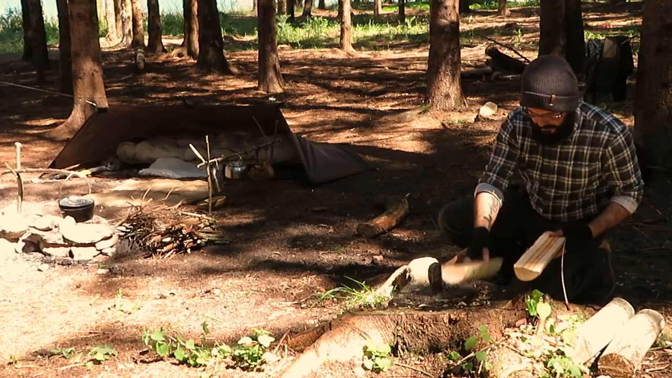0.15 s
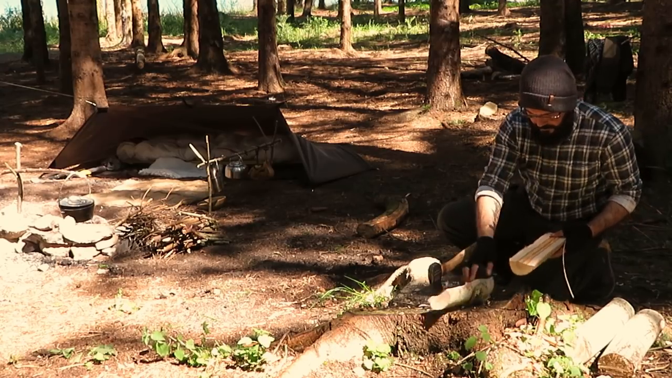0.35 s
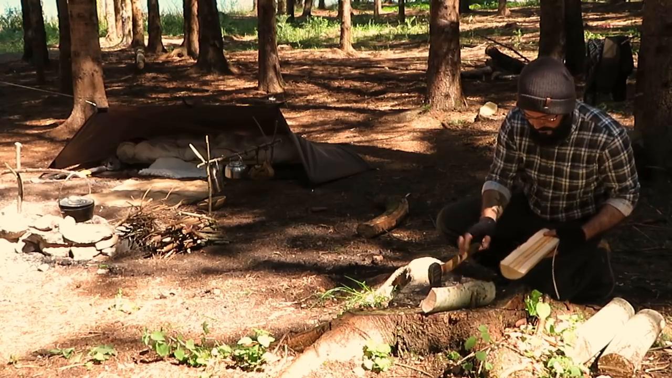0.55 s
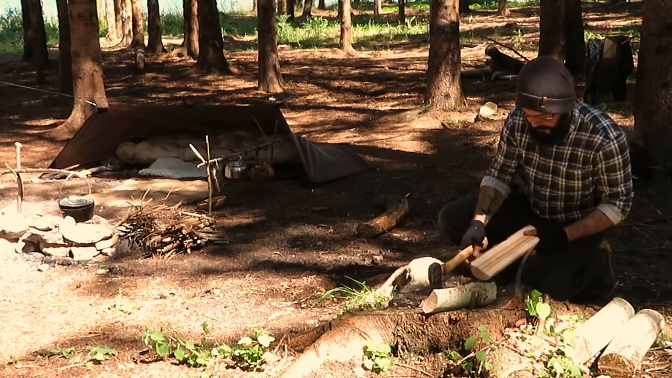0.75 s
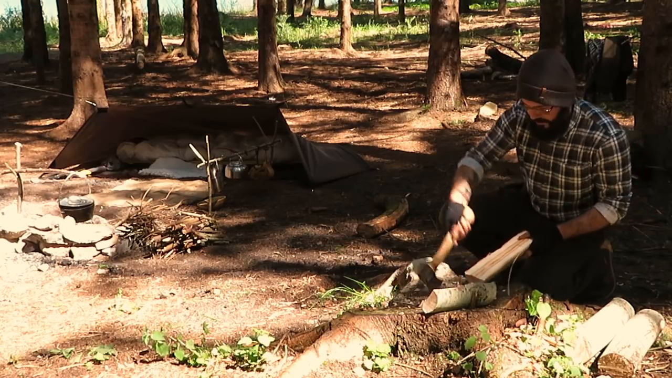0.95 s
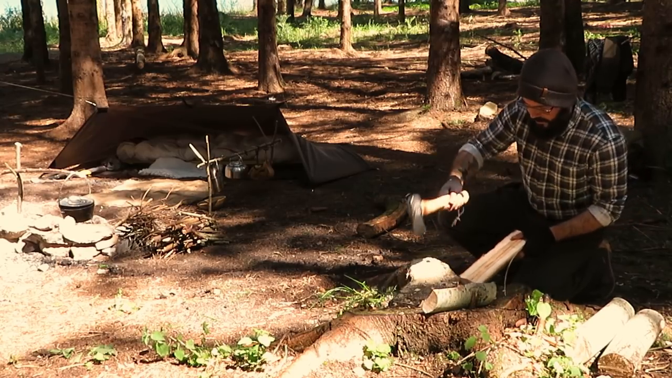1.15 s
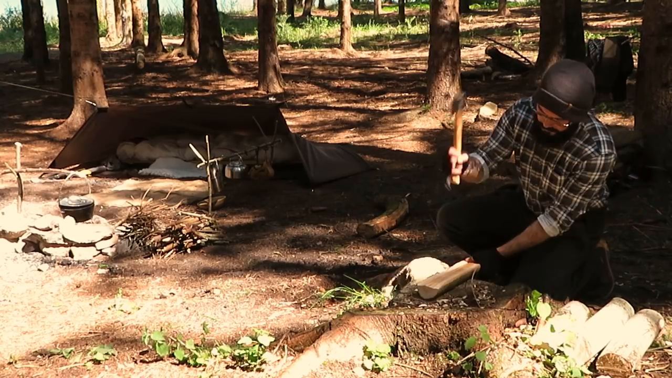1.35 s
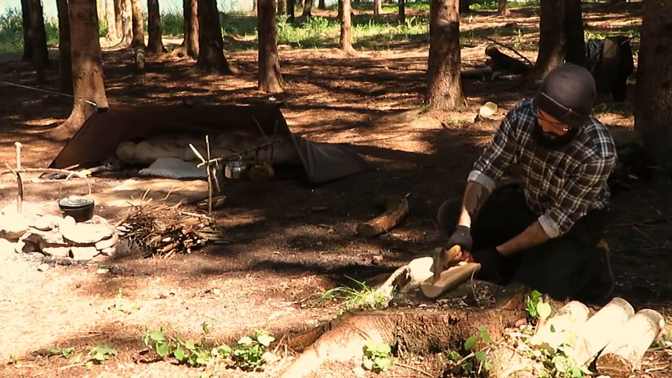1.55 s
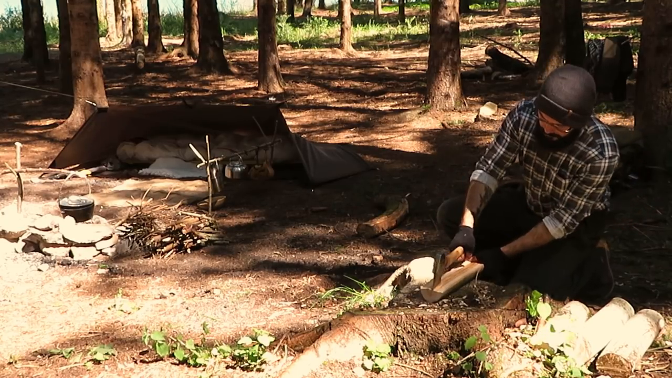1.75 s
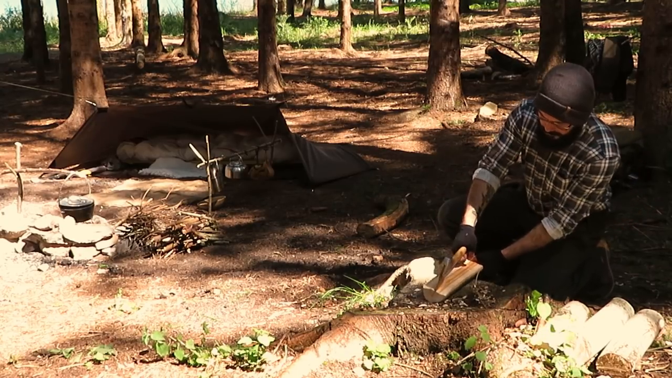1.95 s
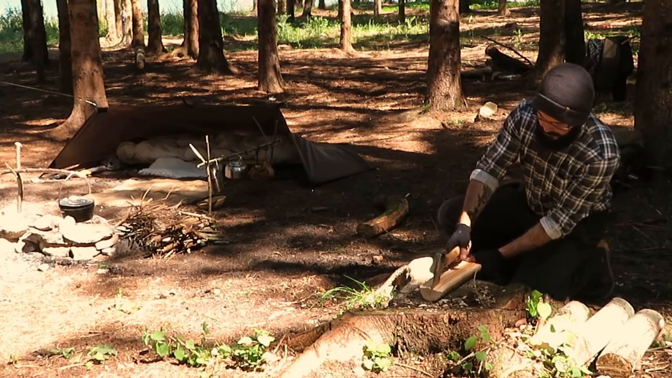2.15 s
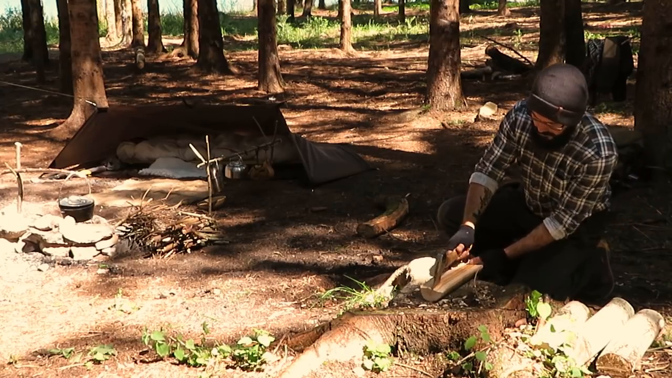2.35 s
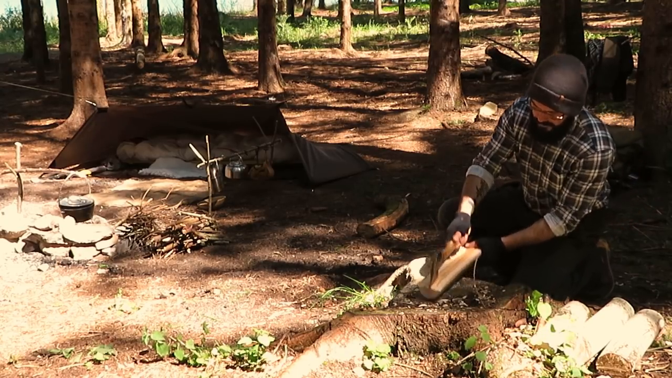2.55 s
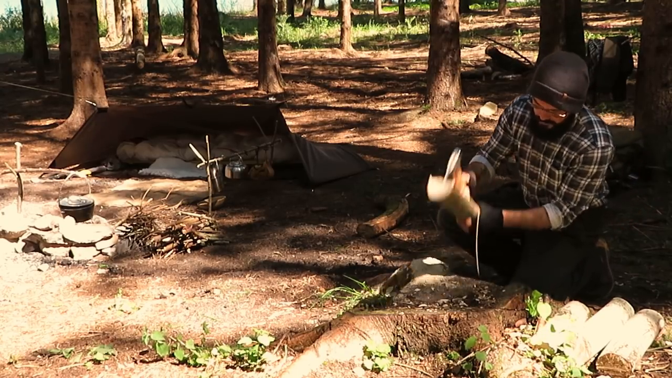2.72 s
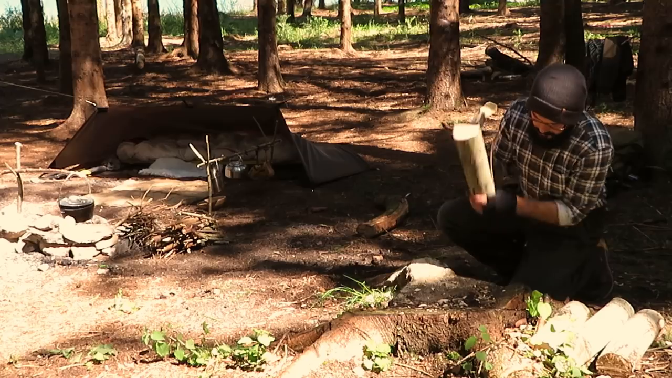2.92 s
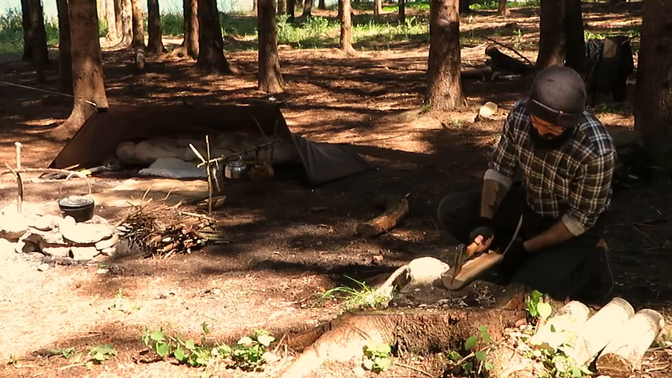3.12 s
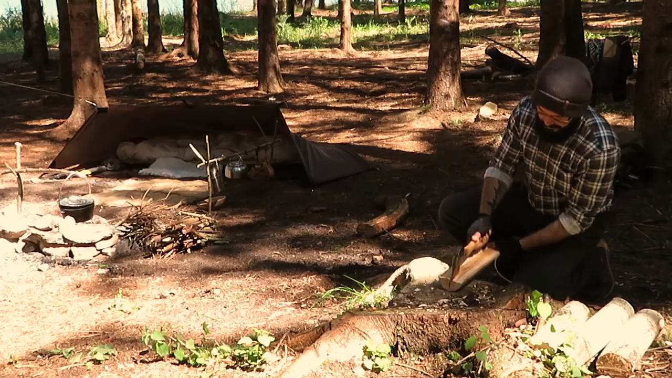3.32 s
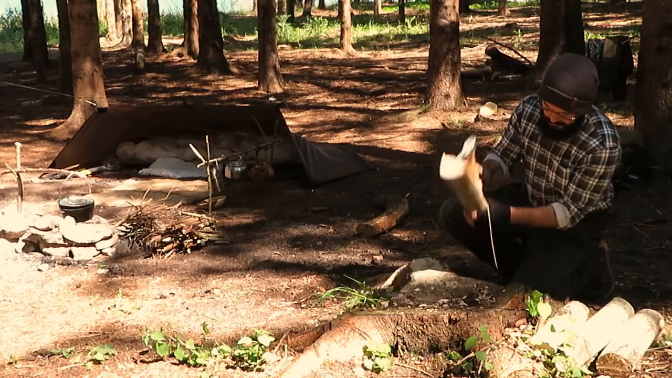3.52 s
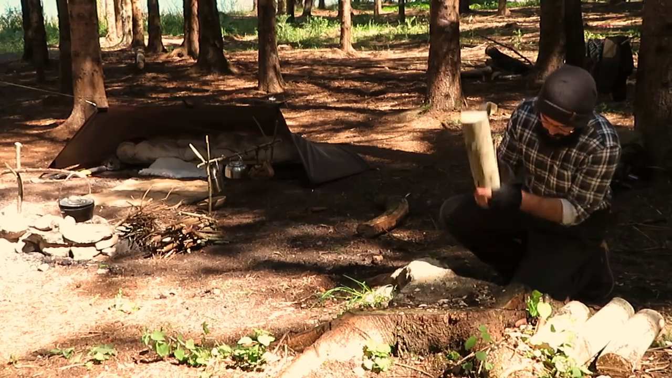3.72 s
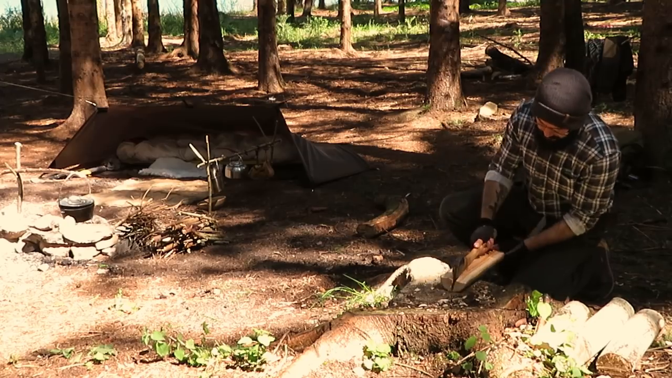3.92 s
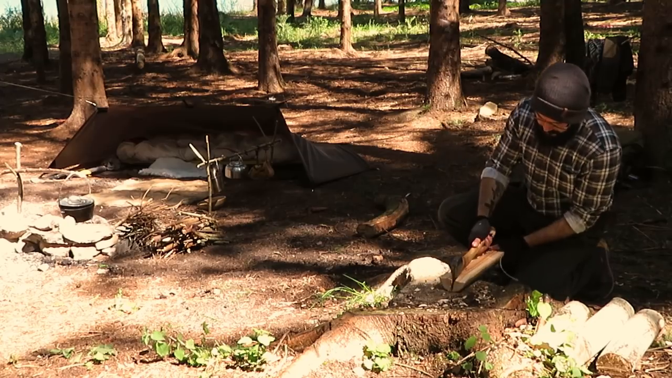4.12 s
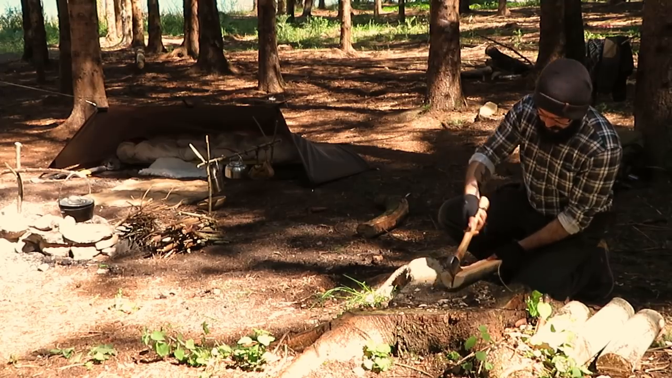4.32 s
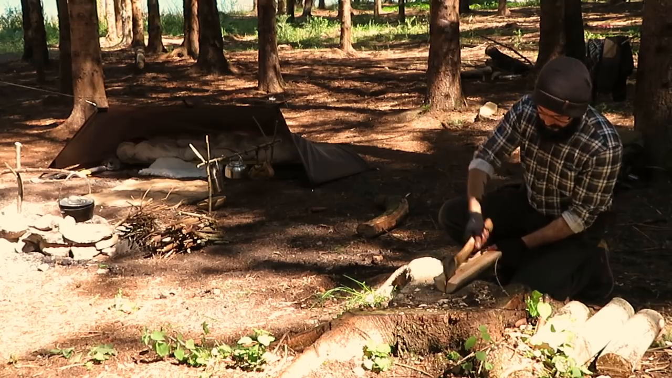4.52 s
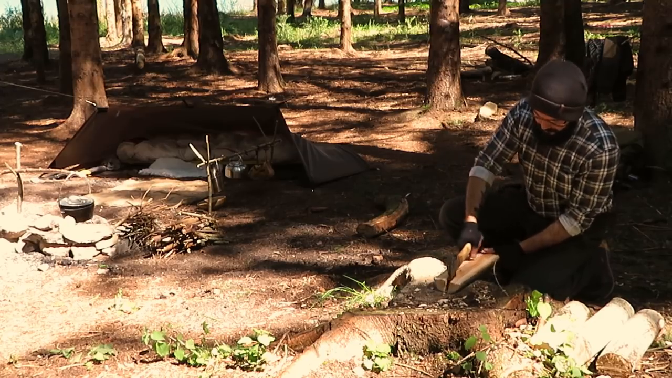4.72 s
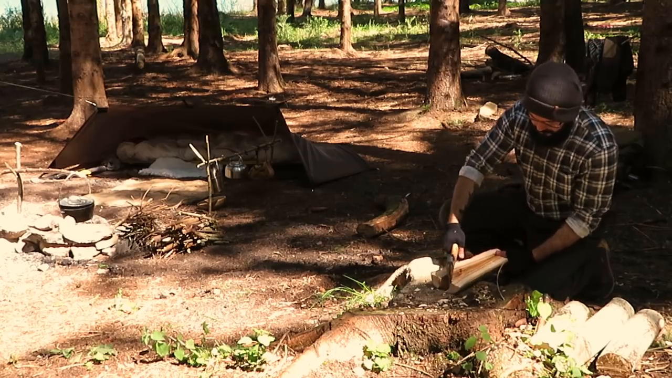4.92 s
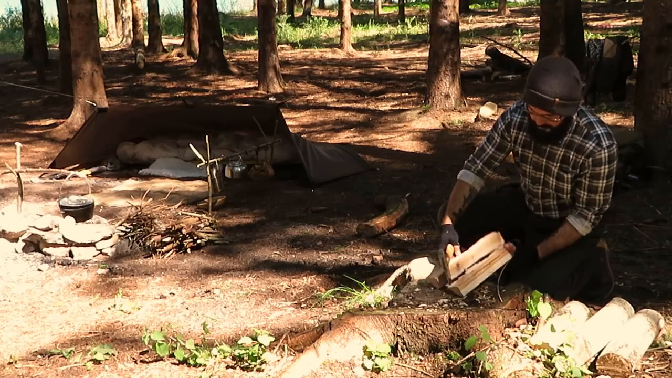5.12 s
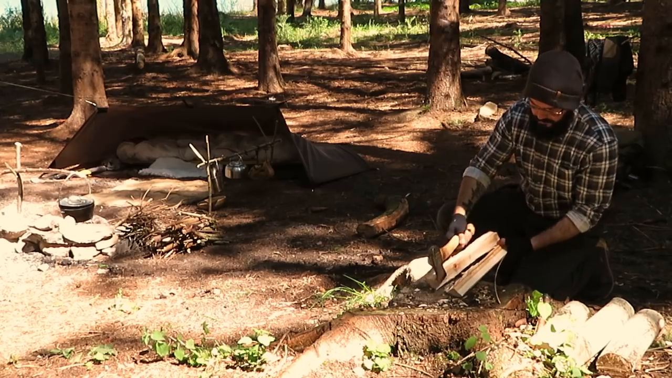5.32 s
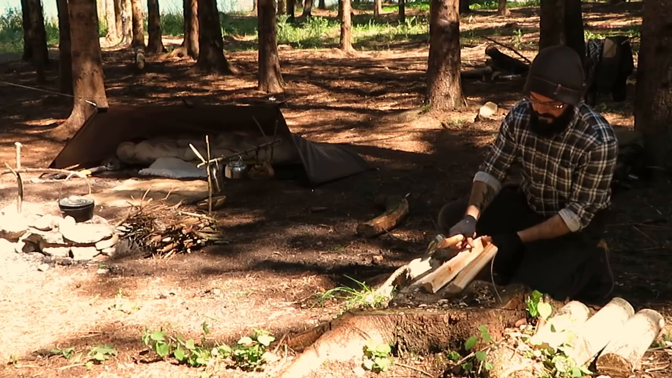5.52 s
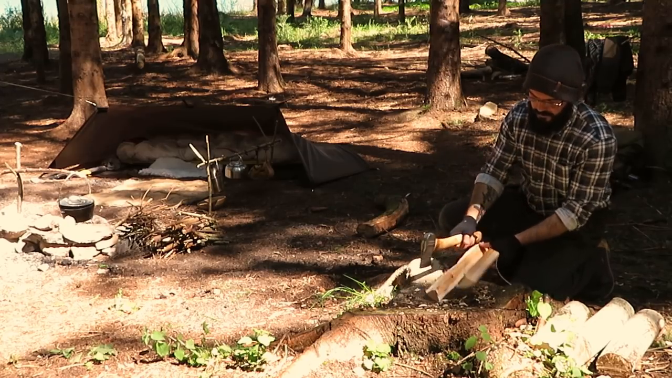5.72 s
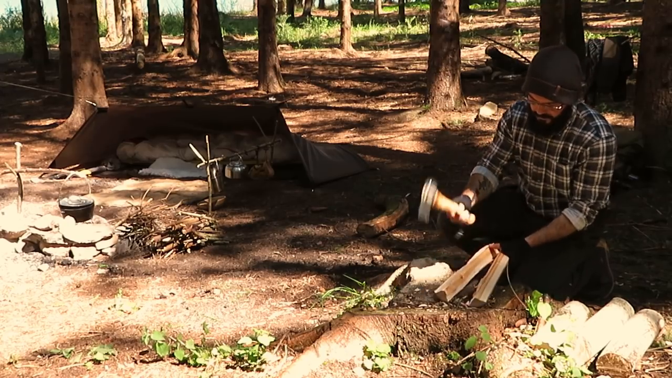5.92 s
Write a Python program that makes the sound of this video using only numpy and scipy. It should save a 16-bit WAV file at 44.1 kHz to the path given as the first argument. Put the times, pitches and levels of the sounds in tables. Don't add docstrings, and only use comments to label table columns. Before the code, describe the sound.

Three sharp, overloading hatchet blows ring out over soft forest air and thin birdsong, between a dull log landing and a crackling tear.

```python
import sys
import numpy as np
from scipy import signal
from scipy.io import wavfile
from scipy.ndimage import map_coordinates

SR = 44100
rng = np.random.default_rng(int(sys.argv[2]) if len(sys.argv) > 2 else 0)


def elevation(decibels):
    levels = np.asarray(decibels, float)
    return 10 ** (levels / 20)


def inscribe(sig):
    pcm = np.round(np.clip(np.atleast_2d(sig).T, -1, 1) * 32767)
    wavfile.write(sys.argv[1], SR, pcm.astype(np.int16))


N = 262836
SIDES = np.array([[1], [-1]])

# t/s, strength over overload/dB, weight/dB, echo level/dB, crack/dB
BLOWS = [
    (1.5994, 11.5, -3.5, -16.5, -31),
    (3.1069, 13.5, -20.5, -18, -17.5),
    (3.9264, 14, -23.5, -13.5, -18),
]


def rms_one(x):
    return x / np.sqrt(np.mean(x ** 2) + 1e-20)


def at_hz(points, hz, column=1):
    points = np.array(points)
    return np.interp(np.log(hz), np.log(points[:, 0]), points[:, column])


def add(track, sound, s):
    i = round(s * SR)
    track[..., i:i + sound.shape[-1]] += sound[..., :track.shape[-1] - i]


def butter(x, hz, kind, order=2):
    return signal.sosfilt(signal.butter(order, hz, kind, fs=SR, output="sos"), x)


def drift(rate_hz):
    knots = rng.standard_normal(400)
    return map_coordinates(knots, [np.arange(N) / SR * rate_hz], order=3)


def resonate(x, peaks):
    out = 0
    for k, (hz, width_hz, db) in enumerate(peaks):
        r = np.exp(-np.pi * width_hz / SR)
        zeros = [(1 - r * r) / 2, 0, (r * r - 1) / 2]
        poles = [1, -2 * r * np.cos(2 * np.pi * hz / SR), r * r]
        out = out + (-1) ** k * elevation(db) * signal.lfilter(zeros, poles, x)
    return out


def bands(size, likeness, gain):
    edges_hz = 25 * 2 ** np.arange(0, 9.6, .5)
    out, white = 0, rng.standard_normal((2, 2, size))
    for k, (low, high) in enumerate(zip(edges_hz, edges_hz[1:])):
        mid, side = butter(white[k % 2], [low, high], "band")
        hz = np.sqrt(low * high)
        alike = np.clip(at_hz(likeness, hz), -1, 1)
        out = out + gain(hz) * (np.sqrt(1 + alike) * mid + np.sqrt(1 - alike) * side * SIDES)
    return out


def forest(colour):
    # f/Hz, t60/s
    t60_s = [(100, 0.38), (300, 0.18), (800, 0.83), (1900, 0.64), (3400, 0.65), (6400, 0.19), (12000, 0.14)]
    # f/Hz, correlation
    likeness = [(60, 0.78), (180, 0.93), (550, 1), (1650, 0.98), (4970, 0.75), (15000, 0.02)]
    t = np.arange(SR) / SR
    chance = map_coordinates(rng.standard_normal(300), [t * 160], order=1)
    clumps_db = 2.5 * np.exp(-t / 0.18) * chance
    swell = (1 - np.exp(-(t / .019) ** 2)) * elevation(clumps_db)

    def dying(hz):
        decay_s = at_hz(t60_s, hz)
        near = elevation(-60 * t / decay_s)
        far = elevation(-21.0 - hz / 270 - 60 * t / (2.0 * decay_s))
        return elevation(at_hz(colour, hz)) * (near + far)

    out = swell * bands(SR, likeness, dying)
    return out / np.sqrt(np.sum(out ** 2) / 2)


def glides(table, wobble_hz):
    out = np.zeros(N)
    wobble = wobble_hz * rms_one(butter(rng.standard_normal(N), 150, "low"))
    for s, length_s, start_hz, end_hz, db in table:
        n, i = round(length_s * SR), round(s * SR)
        pitch_hz = end_hz + (start_hz - end_hz) * np.linspace(1, 0, n) ** 2 + wobble[i:i + n]
        tone = np.sin(2 * np.pi * np.cumsum(pitch_hz) / SR)
        add(out, elevation(db + 7) * np.hanning(n) ** .5 * tone, s)
    return out


def leaves(swell_db):
    # f/Hz, level per Hz/dB
    colour = [(26, -31.5), (45, -2), (139, -5), (450, -11.5), (1100, -15.5), (6770, -29), (11000, -36.5),
              (16000, -45.5)]
    # f/Hz, correlation
    likeness = [(60, 1), (180, 0.72), (550, 0.37), (1650, 0.4), (4970, 0.28), (15000, 0.14)]
    level_db, gust_db, patch_db = -47.5, .4, .6
    gust = gust_db * drift(4.2)
    hiss = bands(N, likeness, lambda hz: elevation(at_hz(colour, hz) + gust + patch_db * drift(12)))
    return elevation(level_db + swell_db) * rms_one(hiss)


def far_drone(swell_db):
    level_db, follow, sway_db = -60.5, 2.5, 2
    drone = rms_one(resonate(rng.standard_normal((2, N)), [(860, 220, 0)]))
    return drone * elevation(level_db + follow * swell_db + sway_db * drift(4.0))


def breeze():
    # t/s, level/dB
    rumble_db = [(0.0, -49), (0.55, -63), (0.99, -55), (1.51, -56.5), (1.89, -75.5), (2.37, -65),
                 (4.53, -74.5), (5.96, -60)]
    s, db = np.transpose(rumble_db)
    rumble = rms_one(butter(rng.standard_normal(N), [18, 50], "band")) * elevation(2.6 * drift(12))
    return rumble * elevation(np.interp(np.arange(N) / SR, s, db))


def air():
    # t/s, level/dB
    swell = [(0, 0), (.8, -1), (1.5, 0.5), (2.5, 0.5), (3.5, 0), (4.5, 0), (5.2, 0.5), (5.96, 0)]
    swell_db = np.interp(np.arange(N) / SR, *np.transpose(swell))
    return far_drone(swell_db) + leaves(swell_db) + breeze()


def trill():
    start_s, fast_gap_s, extra_gap_s, quicken = 1.905, .060, .065, .69
    first_hz, last_hz, scoop_hz, scoop_from = 7110, 7580, 320, 11
    first_db, last_db, after_db = -63, -54, -4
    note_s, after_s = .036, .022
    k = np.arange(17)
    starts = start_s + fast_gap_s * k + extra_gap_s * (1 - quicken ** k) / (1 - quicken)
    effort = np.clip(k / (scoop_from + 1), 0, 1)
    pitch = first_hz + (last_hz - first_hz) * effort ** 0.81
    level = first_db + (last_db - first_db) * effort
    full = k >= scoop_from
    rows = [(s, note_s, hz - scoop_hz * f, hz, db) for s, hz, db, f in zip(starts, pitch, level, full)]
    return rows + [(s + note_s, after_s, last_hz, last_hz, last_db + after_db) for s in starts[full]]


def warble():
    # offset/s, length/s, start and end above the foot/share of fall, level/dB
    phrase = [
        (-.03, .045, .5, .7, -6),
        (-.005, .1, 1, 0, 0),
        (.01, .085, 1.3, .85, -4),
        (.035, .05, .7, .3, -6),
        (.075, .075, .1, 0, -1),
    ]
    start_s, gap_s, level_db = 3.208, .16, -57
    rows = []
    for k in range(5):
        foot_hz, fall_hz = 7020 + 135 * k, 600 + 95 * k
        for s, length_s, a, b, db in phrase:
            at_s = start_s + gap_s * k + s
            rows.append((at_s, length_s, foot_hz + fall_hz * a, foot_hz + fall_hz * b, level_db + db))
    return rows[:-1]


def bird():
    song = elevation(-1.5) * glides(trill(), wobble_hz=24.85) + elevation(-2.5) * glides(warble(), wobble_hz=90)
    t = np.arange(SR // 4) / SR
    smear = rng.standard_normal((2, len(t))) * elevation(-60 * t / 0.25)
    smear = smear / np.sqrt(np.sum(smear ** 2) / 2)
    direct = np.array([song, np.roll(song, 1)])
    return elevation(-4) * direct + elevation(-1.5) * signal.fftconvolve(song[None], smear)[:, :N]


def handle_creak():
    # t/s, length/s, start f/Hz, end f/Hz, level/dB
    creaks = [
        (1.29, .04, 2060, 2075, -54),
        (1.348, .062, 2120, 2150, -55),
    ]
    return glides(creaks, wobble_hz=25)


def ticks():
    # t/s, peak/dB, lowest f/Hz, decay/s
    tick_table = [(0.319, -37, 1500, .002), (0.322, -41, 3000, .002), (.339, -29, 1000, .002),
                  (0.468, -41, 1500, .002), (0.496, -46, 4000, .003), (1.484, -37.5, 1500, 0.0018),
                  (1.5, -34.5, 1500, .002), (1.5902, -30, 1500, .0006), (1.5943, -33, 600, .0008)]
    out, t = np.zeros(N), np.arange(600) / SR
    draws = rng.standard_normal((len(tick_table), len(t)))
    for (s, db, low_hz, decay_s), draw in zip(tick_table, draws):
        burst = butter(draw * np.exp(-t / decay_s), low_hz, "high")
        burst = butter(burst, 4000, "low", order=1)
        add(out, elevation(db) * burst / np.abs(burst).max(), s)
    return out


def tears():
    # t/s, length/s, level/dB, main f/Hz
    tear_table = [(0.312, 0.022, -45, 2320), (4.61, 0.018, -58, 3530), (4.742, 0.041, -54.5, 1750),
                  (4.781, 0.061, -41.5, 1620), (4.814, 0.047, -49, 3820), (4.862, 0.018, -50.5, 2300),
                  (5.098, 0.057, -49.5, 2200), (5.19, 0.04, -58, 3220)]
    clicks_per_s = 1500
    out = np.zeros(N)
    for s, length_s, db, hz in tear_table:
        marks, sizes, signs = rng.random((3, 4000))
        clicks = (marks < clicks_per_s / SR) * elevation(-4.0 * np.log(sizes + 0.018)) * np.sign(signs - .5)
        pitched = rms_one(resonate(clicks, [(hz, hz * 0.24, 0)]))
        grains = pitched + elevation(-13.5) * rms_one(butter(pitched * 0 + clicks, [1500, 13000], "band"))
        n = round(length_s * SR)
        add(out, elevation(db) * np.hanning(n) ** .5 * grains[:n], s)
    return out


def thuds():
    # t of the deepest push/s, peak/dB, f/Hz
    thud_table = [
        (.3265, -24, 190),
        (.3385, -5.5, 280),
        (.353, -30, 250),
        (.375, -32, 220),
        (.4705, -25, 190),
    ]
    # f/Hz, width/Hz, level/dB
    half_modes = [(680, 53, 2), (1103, 67, -3), (465, 230, -2)]
    cycles = 0.88
    out, touch = np.zeros(N), np.full(N, 1e-18)
    t = np.linspace(-.015, .015, round(.03 * SR))
    for s, db, hz in thud_table:
        envelope = np.exp(-(t * hz / cycles * 1.87) ** 2)
        add(out, -elevation(db) * np.cos(2 * np.pi * hz * t) * envelope, s + t[0])
        add(touch, elevation(db + 2.5) * np.hanning(14), s)
    return out + resonate(touch, half_modes)


def snaps():
    # t/s, peak/dB, crack/dB, low mode/dB, high mode/dB
    snap_table = [(4.614, -37, -26, -14, 8), (4.622, -37.5, -23, -12, 7), (4.753, -33.5, -26, 8, -8),
                  (4.797, -30.5, 0, -6, 8), (4.797, -41, -10, -5, 7), (4.8153, -7.5, -4.5, 7.5, 3.5),
                  (4.828, -31, -9, -4, 7), (4.831, -28.5, -15, -10, 20), (4.840, -25, -2.5, 5, -6),
                  (4.845, -20, -13, -5.5, -8.5), (4.872, -43, -14, -8, -3), (4.899, -23, -7, 0.5, -7.5),
                  (5.040, -31, -2, 1, 4), (5.069, -36, -12, 0, -4.5), (5.076, -22.5, -9, 0.5, -4.5),
                  (5.123, -32.5, -14, -2, -11), (5.197, -39, -18, -6, 7), (5.21, -41, -20, -9, 6)]
    # f/Hz, width/Hz
    half_ring = [(1450, 140), (2230, 230), (3430, 320)]
    out, t = np.zeros(N), np.arange(900) / SR
    draws = rng.standard_normal((len(snap_table), len(t)))
    for (s, db, crack_db, low_db, high_db), draw in zip(snap_table, draws):
        click = draw * np.exp(-t / 0.00052)
        modes = [(hz, width_hz, level) for (hz, width_hz), level in zip(half_ring, (low_db, 0, high_db))]
        release = 1. * (t == 0) + 0.035 * click
        body = butter(resonate(release, modes), 740, "high", order=4)
        crack = butter(click, [6500, 13000], "band")
        add(out, elevation(db) * (body / np.abs(body).max() + elevation(crack_db) * crack / np.abs(crack).max()), s)
    return out


def blows():
    # f/Hz, width/Hz, level/dB
    logs = [
        [(363, 272, 0), (943, 1100, -3), (1378, 230, 1), (2360, 600, -11.5), (3780, 300, -12.5)],
        [(354, 210, 2.5), (736, 290, 0), (1210, 270, -4), (2200, 1300, -6.5), (2770, 600, -2),
         (7500, 1300, -27)],
        [(400, 150, -5.5), (756, 170, -6), (1306, 320, -1), (2010, 860, -6), (2790, 850, -9.5),
         (4430, 320, -12)],
    ]
    # f/Hz, level/dB
    spreads = [
        [(150, 2.5), (400, 0), (900, -13), (1500, -3), (2400, -11), (3900, -13), (6500, -25.5), (13000, -36.5)],
        [(150, -5), (400, -4.5), (900, -10.5), (1900, -9), (3500, -13.5), (6500, -21), (13000, -28.5)],
        [(150, -5), (400, -3.5), (900, -10), (1600, 0), (2300, -7), (3800, -16), (6500, -16), (13000, -23)],
    ]
    # delay/s, level/dB
    trunks = [(.0075, -17.5), (.014, -14), (0.023, -29.5), (.034, -18.5)]
    contact_s, weight_s, push_db = .0039, .0012, -25
    out, t = np.zeros((2, N)), np.arange(2048) / SR
    bite = np.exp(-(t / contact_s) ** 4) + elevation(-20.0) * np.exp(-t / 0.0055)
    force = (1 - np.exp(-t / 0.00023)) * bite
    weight = (t < weight_s) * np.sin(np.pi * t / weight_s) ** 2
    push = -np.sin(2 * np.pi * 150 * t) * t / 0.0022 * np.exp(-t / 0.0038)
    for (s, db, weight_db, echo_db, crack_db), log, spread in zip(BLOWS, logs, spreads):
        mid, side = rng.standard_normal((2, len(t))) * force
        drive = butter(mid, 580, "high", order=1)
        drive[:8] += 3.2 * np.hanning(8)
        drive += elevation(weight_db) * weight
        knock = resonate(drive, log) + elevation(-22.5) * butter(drive, [200, 4000], "band")
        top = np.abs(knock).max()
        crack = butter(mid, [3000, 9000], "band") + butter(side, [7000, 14000], "band") * elevation(-8.5) * SIDES
        width = elevation(-22) * resonate(side, log) * SIDES
        direct = (knock * elevation([[-.25], [.25]]) + width) / top + elevation(crack_db) * crack
        add(out, elevation(db) * direct, s)
        add(out, elevation(db + push_db) * push, s - .003)
        echo = butter((knock + 2.5 * width) / top + elevation(crack_db) * crack, 7000, "low")
        for lag_s, trunk_db in trunks:
            add(out, elevation(db + echo_db + trunk_db + 4.0) * echo, s + lag_s)
        add(out, elevation(db + echo_db + 7) * forest(spread), s)
    return out


def scene():
    hands = snaps() + ticks() + tears()
    creak = handle_creak()
    near = thuds() + hands
    wide = butter(np.roll(hands, 3), 3000, "high") * elevation(-13.5) * SIDES
    scatter = forest([(100, -3.0), (1500, -13.5), (12000, -3.0)])
    echo = elevation(-22.5) * signal.fftconvolve((near + elevation(13) * creak)[None], scatter)[:, :N]
    return air() + bird() + creak + near + wide + echo + blows()


def band_limit(x):
    return signal.sosfilt(signal.butter(12, 16450, fs=SR, output="sos"), x)


def record(dry):
    drop_db, fall_s, hold_s, rise_db_per_s = 5, 0.011, 0.49, 8.5
    t, cut_db = np.arange(N) / SR, np.zeros(N)
    for s, *rest in BLOWS:
        i = round((s + 0.0037) * SR)
        recovery_db = rise_db_per_s * (t[i:] - s - hold_s).clip(0)
        cut_db[i:] = np.clip(cut_db[i] + drop_db - recovery_db, 0, None)
    r = np.exp(-1 / (fall_s * SR))
    gain = elevation(-signal.lfilter([1 - r], [1, -r], cut_db))
    clipped = np.clip(dry * gain, -.98, .98)
    return band_limit(butter(clipped, 12000, "low", order=1))


dry = scene()
out = record(dry)
inscribe(out)
```